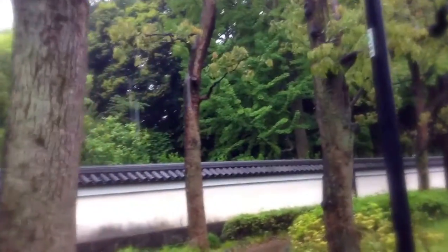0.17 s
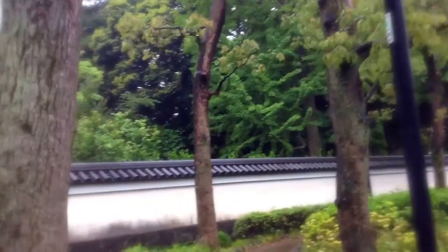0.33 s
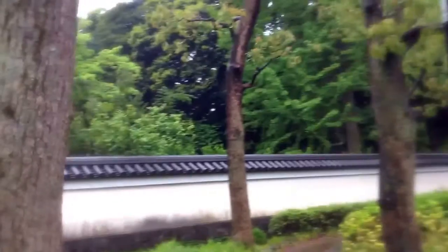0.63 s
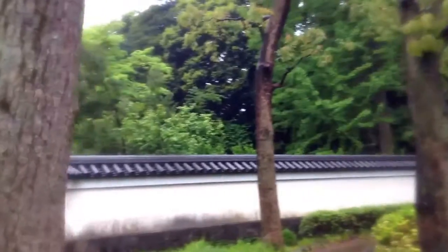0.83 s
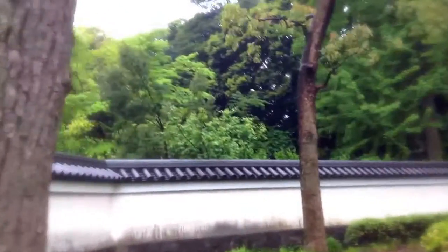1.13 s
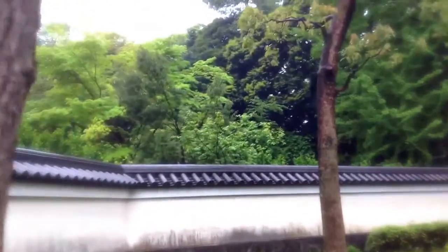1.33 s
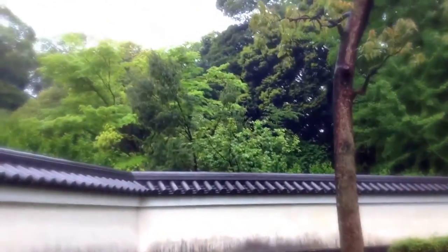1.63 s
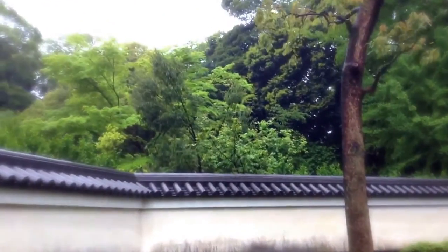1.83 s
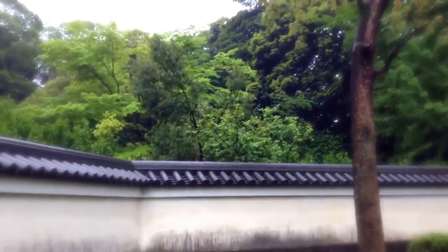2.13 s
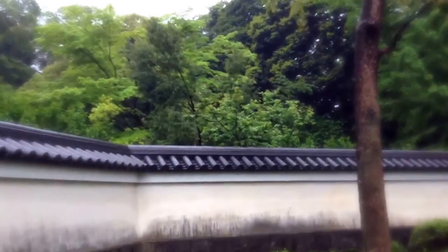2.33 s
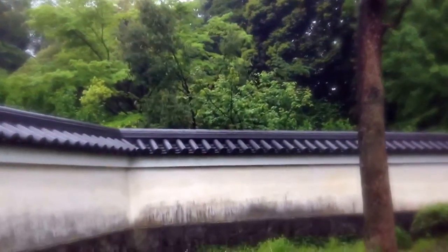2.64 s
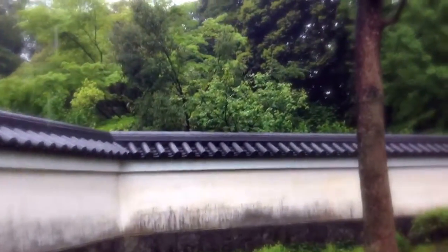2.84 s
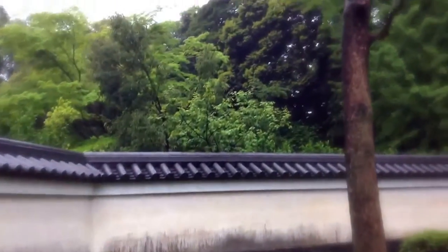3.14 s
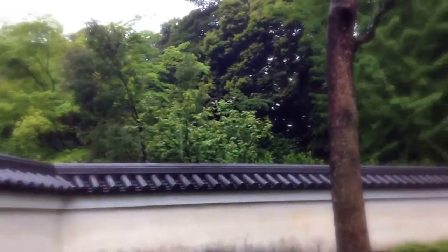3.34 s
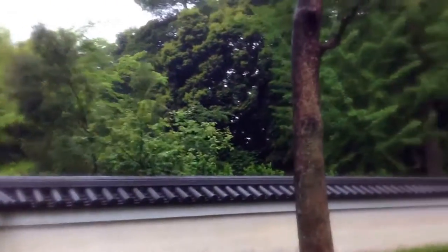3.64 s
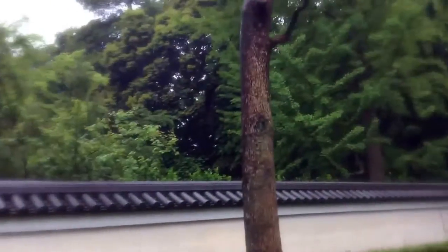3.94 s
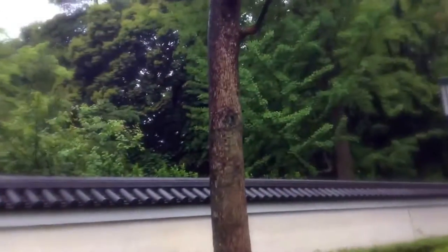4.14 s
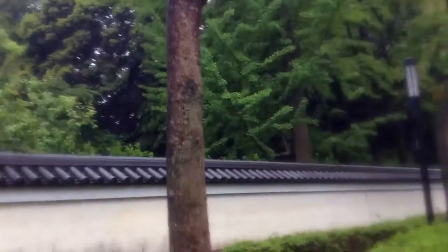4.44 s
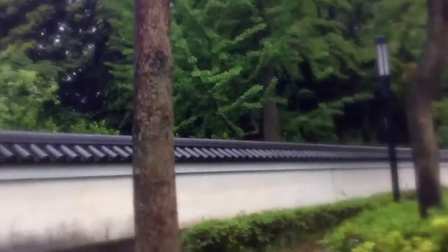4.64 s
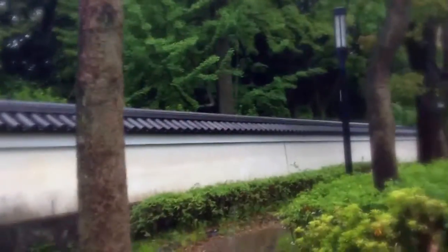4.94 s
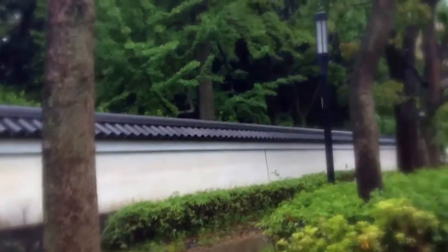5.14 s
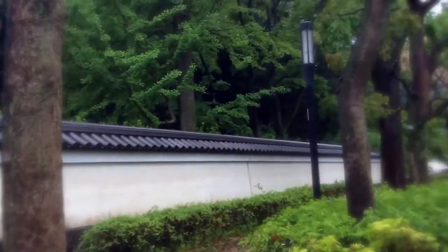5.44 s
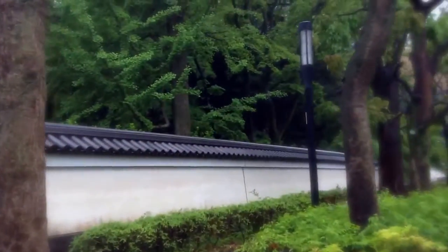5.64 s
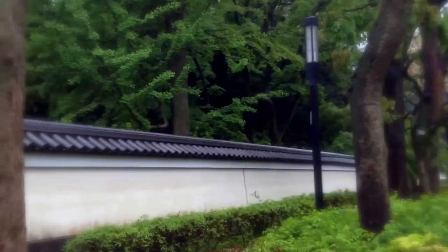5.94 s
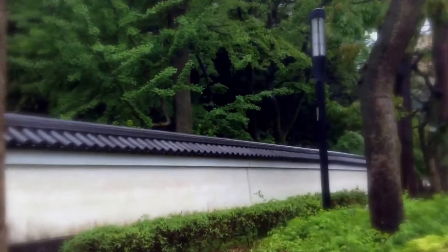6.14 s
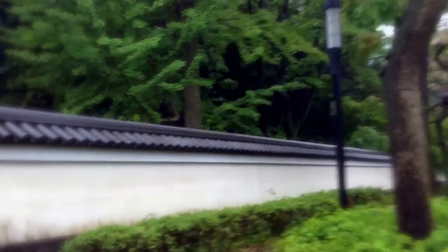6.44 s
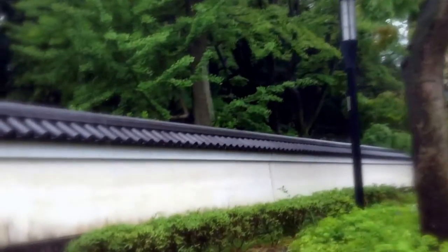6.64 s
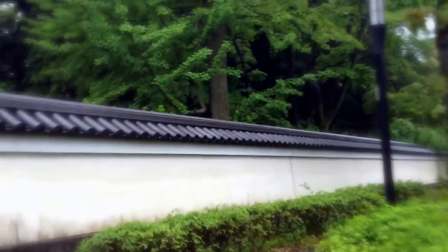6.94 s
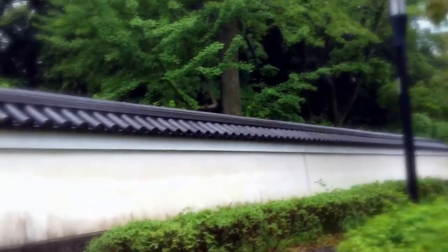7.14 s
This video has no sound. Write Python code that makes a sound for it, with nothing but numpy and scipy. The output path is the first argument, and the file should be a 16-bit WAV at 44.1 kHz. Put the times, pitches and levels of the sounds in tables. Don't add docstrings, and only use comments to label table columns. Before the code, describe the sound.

Rain is already falling at 0 s: a dull, muffled wash of far rain with dense fine patter on leaves, over low distant traffic rumble. It swells gradually. Soft, low drips boom on the umbrella canopy around 0.4-0.55 s, with weaker ones near 2 s and 2.5 s, and faint splashes tick between. From 3.4 s heavier drips knock close by, hollow and very short, with a small cloth snap. Hard hits at 3.6 and 3.9 s make the rain level drop instantly, then creep back; a lighter dip follows at 4.64 s. By then the leaves' treble fizz has faded. Knocks crowd together from 4.9 to 5.9 s, especially 5.3-5.87 s, holding the rain down. After a last strong knock at 6.0 s, drips become sparse, the rain recovers fuller, and a far engine drones low and wavering until the end, about 7.3 s.

```python
import sys
import numpy as np
from scipy import signal
from scipy.fft import rfft, irfft
from scipy.io import wavfile
from scipy.ndimage import uniform_filter1d

SR = 44100
rng = np.random.default_rng(int(sys.argv[2]) if len(sys.argv) > 2 else 0)


def to_wav(s):
    ch = np.atleast_2d(s).T
    pcm = np.round(np.clip(ch, -1, 1) * 32767)
    wavfile.write(sys.argv[1], SR, pcm.astype(np.int16))


def ratio_of_db(decibels):
    return 10 ** (np.asarray(decibels, float) / 20)


N = 321048


def evened(x):
    return x / np.sqrt(np.mean(x ** 2) + 1e-20)


def add(mix, s, sound):
    part = mix[round(s * SR):][:len(sound)]
    part += sound[:len(part)]


def band(x, lo_hz, hi_hz):
    return signal.sosfilt(signal.butter(2, [lo_hz, hi_hz], "bandpass", fs=SR, output="sos"), x)


def drift(first, second):
    return evened(uniform_filter1d(uniform_filter1d(rng.standard_normal(N), first), second))


def bumps_db(rows, t):
    return sum(db * np.exp(-((t - s) / length) ** 2) for s, length, db in rows)


# (middle t/s, length t/s, pitch f/Hz, level over the rain/dB)
ENGINE_ORDERS = [(6.2, .3, 159, -1), (6.95, .45, 158, -4), (6.25, .18, 198, -3), (7.12, .25, 200, -3),
                 (6.05, .06, 152, -4), (7.23, .05, 262, -4), (6.78, .07, 248, -3), (6.18, .06, 248, -5),
                 (2.88, .22, 166, -3), (3.48, .16, 122, -8), (1.45, .12, 247, -7), (4.75, .25, 120, -13),
                 (2.35, .15, 127, -11), (3.75, .1, 118, -11), (3.05, .06, 212, -4), (.9, .12, 95, -16)]
WAVER_HZ = 1.3


def engine(t):
    waver = WAVER_HZ * drift(5000, 3000)
    tones = 0
    for s, length, hz, db in ENGINE_ORDERS:
        turns = np.cumsum(hz + waver * hz / 160) / SR
        tones = tones + ratio_of_db(db) * np.exp(-((t - s) / length) ** 2) * np.sin(2 * np.pi * turns)
    return tones


# (middle t/s, length t/s, lift level/dB)
TRAFFIC_PASSES = [(2.899, 0.58, 1.5), (4.6, 0.05, 3.5), (6.7, 0.089, 3.5), (7.0, 0.38, -1), (6.4, 0.11, 4),
                  (0.5, .12, 4), (1.4, 0.2, 0), (2.4, 0.14, -1.5), (4.7, 0.11, -3), (3.23, .1, -2),
                  (0.78, .08, -1), (1.07, .06, 1.5), (6.62, .15, -3.5), (6.4, .12, -3), (2.63, .03, -3),
                  (3.02, .02, -3), (5.6, .06, 2.5)]
RUMBLE_DB = -1.5
DRONE_HZ, DRONE_WIDTH_HZ, DRONE_DB = 165, 12, -17


def rumble_layer(low_rain, t):
    hum = band(rng.standard_normal(N), DRONE_HZ - DRONE_WIDTH_HZ, DRONE_HZ + DRONE_WIDTH_HZ)
    rumble = evened(low_rain) + ratio_of_db(DRONE_DB) * evened(hum)
    return evened(rumble) * ratio_of_db(RUMBLE_DB + bumps_db(TRAFFIC_PASSES, t) + 0.74)


# (middle t/s, length t/s, lift level/dB)
LEAF_GUSTS = [(0.05, 0.22, 2), (1.166, 0.1, 3), (1.65, 0.12, 1), (2.3, 0.25, 2), (3.3, 0.26, 1),
              (2.7, 0.047, 2.5), (4.9, 0.066, 2), (5.2, 0.27, 1), (6.82, .05, -2), (7.15, .1, -0.5),
              (5.4, .03, 0.5), (0.83, 0.14, 0), (0.76, .05, 0.5), (1.29, .06, 2.5), (2.3, .06, 2.5),
              (1.92, 0.046, -0.5), (2.7, .04, -0.5), (2.7, .04, -2), (2.6, .04, 1.5), (2.27, .06, -2),
              (6.6, .06, -2)]
FIZZ_DB = -11
TURN_S, SHADE_DB = 4.65, -5.5


def fizz_layer(high_rain, t):
    fizz_db = FIZZ_DB + SHADE_DB * np.minimum(t / TURN_S, 1) + bumps_db(LEAF_GUSTS, t)
    return evened(high_rain) * ratio_of_db(fizz_db + 3.0)


def wash():
    frames = N // 64 + 8
    a, b, patches, flicker = rng.standard_normal((frames, 129, 4)).T
    patches = evened(uniform_filter1d(uniform_filter1d(patches, 4, 0), 50, 1))
    flicker = evened(uniform_filter1d(uniform_filter1d(flicker, 60, 0), 12, 1))
    z = (a + 1j * b) * ratio_of_db(1.0 * patches + 0.67 * flicker)
    return evened(signal.istft(z, nperseg=256, noverlap=192)[1][:N])


PATTER_PER_S, PATTER_SPREAD_DB, PATTER_DB = 1500, 3, -6


def patter():
    landed = rng.random(N) < PATTER_PER_S / SR
    size = ratio_of_db(PATTER_SPREAD_DB * np.minimum(rng.exponential(1, N), 2.8)) * landed
    leaf, out = rng.integers(0, 24, N), np.zeros(N)
    for k, hz in enumerate(np.geomspace(300, 12000, num=24)):
        turns = np.arange(0, 5, hz / SR)
        wavelet = turns * np.exp(-turns / 0.45) * np.sin(2 * np.pi * turns)
        out += signal.oaconvolve(size * (leaf == k), wavelet * hz / 12000)[:N]
    return evened(out)


# (f/Hz, level per Hz/dB)
MUFFLED_COLOUR = [(25.0, -38), (50.0, -24), (100.0, -9.5), (155.0, 2.35), (230.0, 3.5), (330.0, -3),
                  (650.0, -1), (1000.0, -3.5), (1600.0, -12.5), (2600.0, -25.5), (4500.0, -40.5),
                  (7500.0, -55.5), (11000.0, -67), (14300.0, -79)]


def muffle(x):
    hz, db = np.transpose(MUFFLED_COLOUR)
    half = np.interp(np.log(np.fft.rfftfreq(8192, 1 / SR) + 1), np.log(hz + 1), db)
    log_gain = np.log(ratio_of_db(np.maximum(half, -110)))
    circle = np.r_[log_gain, log_gain[-2:0:-1]]
    taps = np.fft.ifft(np.exp(np.conj(signal.hilbert(circle)))).real[:4096]
    return signal.oaconvolve(np.r_[x[-4096:], x], taps)[4096:4096 + len(x)]


# (t/s, drop level/dB)
GAIN_TRIPS = [
    (3.61, 15),
    (3.938, 15),
    (4.639, 9),
    (5.298, 14),
    (5.445, 12),
    (5.512, 7.5),
    (5.58, 11.5),
    (5.785, 10.5),
    (5.862, 10),
]
DUCK_FALL_S, DUCK_RELEASE_S = 0.0045, 0.4


def ducking_db(t):
    s, drop_db = np.transpose(GAIN_TRIPS)[:, :, None]
    since = np.maximum(t - s, 0)
    dips = drop_db * np.minimum(since / DUCK_FALL_S, 1) * np.exp(-since / DUCK_RELEASE_S)
    return -np.max(dips, axis=0)


# (t/s, rain level/dB)
SHOWER_LEVEL = [(0.0, -35.5), (0.4, -35.5), (0.7, -34.5), (0.95, -33.5), (1.5, -32.5), (2.05, -33),
                (2.45, -33), (3.3, -31.5), (3.7, -32.5), (3.85, -31), (4.15, -29.5), (4.5, -31), (5.0, -31),
                (5.7, -29.5), (6.3, -28), (6.75, -28.5), (7.27, -31)]
# (middle t/s, length t/s, lift level/dB)
CLUMPS_AND_LULLS = [(.4, 0.04, -0.5), (.85, 0.048, 1.5), (1.3, 0.062, -2.5), (1.45, 0.055, -1),
                    (2.6, 0.11, -1.5), (3.9, .04, 1.5), (6.4, .08, -2), (4.73, .008, -3), (7.159, .006, -2),
                    (2.525, .006, -3.5), (3.601, .004, -2), (3.3, 0.016, 1.5), (3.82, 0.022, 1),
                    (4.52, 0.035, 3), (5.05, 0.059, 2), (5.15, 0.052, -2.5), (5.55, 0.054, -1.5),
                    (6.62, .05, 1.5), (6.82, 0.041, 2), (7.27, .05, 0)]
FLUTTER_DB, FLUTTER_S = 0.17, 0.028


def shower_db(t):
    clump = round(FLUTTER_S * SR)
    swell_db = np.interp(t, *np.transpose(SHOWER_LEVEL))
    flutter_db = FLUTTER_DB * drift(clump, clump // 2)
    return swell_db + ducking_db(t) + bumps_db(CLUMPS_AND_LULLS, t) + flutter_db


def rain():
    t = np.arange(N) / SR
    full = muffle(wash() + ratio_of_db(PATTER_DB) * patter())
    hz, spectrum = np.fft.rfftfreq(N, 1 / SR), rfft(full)
    low = 1 / (1 + (hz / 330) ** 4)
    high = 1 / (1 + (1900 / (hz + 1)) ** 4)
    low_rain, high_rain = irfft(spectrum * low, N), irfft(spectrum * high, N)
    body = evened(full - low_rain - high_rain) * ratio_of_db(1.5)
    layers = body + rumble_layer(low_rain, t) + fizz_layer(high_rain, t) + engine(t)
    return layers * ratio_of_db(shower_db(t))


def splash(db, hz, rough):
    t = np.arange(len(rough)) / SR
    spray = band(band(rough, 0.62 * hz, min(1.08 * hz, 20000)), 0.6 * hz, min(1.5 * hz, 20000))
    return ratio_of_db(db - 2.5 - 60 * t / 0.0094) * np.minimum(t / 0.0006, 1) * evened(spray)


# (t/s, peak level/dB, pitch f/Hz)
LOOSE_SPLASHES = [(0.7547, -50, 7000), (1.5584, -48, 7000), (1.7644, -53, 7000), (2.789, -55, 9500),
                  (2.86, -61, 10000), (3.3223, -48, 7000), (3.3553, -53, 7000), (3.912, -58, 8500),
                  (4.1031, -58, 7000), (4.1764, -49, 7200), (4.258, -37, 3200), (4.636, -49, 7000),
                  (5.075, -51, 6800), (5.2639, -58, 7000), (5.4984, -50, 7000), (5.692, -38, 3220),
                  (5.747, -48, 4200), (6.6528, -57, 7000), (7.023, -58, 8500), (7.098, -54, 6000),
                  (1.519, -62, 8500), (1.903, -63, 8500), (2.052, -60, 8800), (3.913, -71, 12500),
                  (3.932, -72, 12000), (4.068, -72, 11000), (4.176, -75, 12500), (4.592, -64, 9400),
                  (4.637, -76, 12000), (5.074, -59, 9500), (6.97, -64, 8500), (1.102, -35, 2900),
                  (1.236, -42, 2950), (1.53, -41, 3080), (1.702, -37, 2600), (.751, -41, 2600),
                  (.999, -42, 2930), (.629, -43, 3040), (5.859, -40.5, 3750), (6.017, -26, 2100),
                  (3.933, -37, 2800), (5.51, -33, 3000), (5.756, -37, 3700), (1.103, -46, 4300),
                  (1.5544, -29, 1700), (2.1186, -30, 1700), (.3017, -33, 1700), (1.1233, -33, 1800),
                  (3.0604, -32, 1700), (3.607, -36, 2800), (5.455, -44, 3200), (2.5, -38, 2700),
                  (5.442, -45, 5200), (5.757, -47, 5800)]


def loose_splashes():
    out = np.zeros(N)
    for s, db, hz in LOOSE_SPLASHES:
        add(out, s, splash(db, hz, rng.standard_normal(900)))
    return out


def rib(db, hz):
    t = np.arange(2200) / SR
    decay = ratio_of_db(db - 60 * t * hz / 9.2)
    ring = decay * np.minimum(t / 0.00078, 1) * np.sin(2 * np.pi * hz * t)
    return band(ring, 0.35 * hz, 1.9 * hz)


# (t/s, peak level/dB, pitch f/Hz)
RIB_RINGS = [(3.609, -26, 500), (3.9341, -20.5, 300), (3.935, -25.5, 160), (4.542, -28, 210),
             (4.926, -13, 425), (5.095, -35, 600), (5.3014, -26, 290), (5.4422, -17, 394), (5.5, -18, 330),
             (5.51, -24, 440), (5.521, -27, 300), (5.5626, -22, 450), (5.575, -30, 600),
             (5.758, -11.5, 358), (5.782, -23, 385), (5.867, -23, 420), (6.018, -18.5, 380),
             (0.44, -27, 220), (.5545, -26, 200), (2.499, -30, 300), (.394, -25, 390), (0.4, -21, 410),
             (3.611, -24, 240), (3.609, -37, 95), (.3985, -18, 460), (.386, -24, 430), (2.668, -21, 190),
             (4.9255, -22, 600), (2.5345, -26, 380), (6.2, -21, 420), (5.5745, -27, 440), (.265, -19, 370),
             (.272, -24, 790), (6.575, -22, 260), (6.695, -21, 270), (2.512, -22, 270)]


def canopy_ribs():
    out = np.zeros(N)
    for s, db, hz in RIB_RINGS:
        add(out, s, rib(db, hz))
    return out


# (f/Hz, width f/Hz, level/dB)
CLOTH_MODES = [
    (1890, 600, 6.5),
    (2800, 420, 1),
    (3700, 380, -6),
    (5250, 600, -14),
    (6500, 900, -23),
]
CATCH_DB, TAUT_HZ = 4.0, 650


def canopy_knock(hz, t60, rough, t):
    swing = 0.78 / hz
    after = np.maximum(t - swing, 0)
    taut = min(hz / TAUT_HZ, 1)
    sag = 0.52 * taut * (1 - np.exp(-after / (0.6 * swing)))
    turns = np.cumsum(hz * (0.97 - sag)) / SR
    rise = np.minimum(t / (0.54 * swing), 1) ** 1.1
    catch_db = CATCH_DB * taut * np.clip(after / (0.49 * swing), 0, 1)
    knock = np.sin(2 * np.pi * turns) * rise * ratio_of_db(-60 * after / t60 - catch_db)
    rattle = evened(band(band(rough, 0.29 * hz, 1.07 * hz), 0.25 * hz, 1.9 * hz))
    rattle = rattle * ratio_of_db(-14.5 - 60 * t / 0.07) * np.minimum(t / 0.0018, 1)
    return band(knock + rattle, 0.14 * hz, 5.5 * hz)


def cloth_tick(rough):
    burst = signal.windows.hann(round(0.0009 * SR))
    splat = np.zeros(len(rough))
    splat[:len(burst)] = rough[::-1][:len(burst)] * burst + 3.0 * burst ** 40
    tick = 0
    for k, (hz, width, db) in enumerate(CLOTH_MODES):
        tick = tick + (-1) ** k * ratio_of_db(db) * band(splat, hz - width / 2, hz + width / 2)
    return tick / abs(tick).max()


# (t/s, peak level/dB, canopy pitch f/Hz, tick relative to the knock
# level/dB)
CANOPY_DRIPS = [(3.4035, -18, 562, -30), (3.6082, -12, 700, -21), (3.9341, -9, 770, -32),
                (4.166, -25, 390, -17), (4.3333, -19.5, 845, -17), (4.542, -9, 780, -32),
                (4.638, -17, 900, -18), (4.9254, -13, 665, -30), (5.076, -19, 820, -18),
                (5.0941, -15.5, 616, -22), (5.1196, -22, 714, -14), (5.2983, -11, 673, -22),
                (5.442, -10.5, 594, -25), (5.4993, -17, 834, -24), (5.5093, -10, 604, -29),
                (5.561, -16, 717, -17.5), (5.57480, -16, 652, -24), (5.734, -11, 617, -28),
                (5.7568, -10, 840, -39), (5.7822, -16, 840, -32), (5.8592, -10.5, 723, -34),
                (6.018, -14, 906, -21.5),
                (0.047, -24, 200, -40), (0.379, -22, 199, -40), (0.393, -21, 440, -37),
                 (0.405, -19, 440, -28), (0.5447, -17, 190, -35), (0.5557, -11, 205, -40),
                 (2.5005, -13.5, 210, -34), (2.5338, -15.5, 600, -37), (3.058, -19, 200, -40),
                 (4.9245, -20, 617, -17), (5.742, -20, 590, -26), (5.868, -24, 523, -26),
                 (0.877, -28, 840, -30), (1.05, -26, 545, -32), (1.881, -24, 890, -30),
                 (1.987, -18, 575, -30), (2.45, -22, 525, -28), (2.897, -21, 845, -30),
                 (3.323, -15, 530, -30), (3.814, -26, 660, -27), (4.4, -25, 593, -31),
                 (4.496, -24, 600, -31.5), (4.601, -29, 900, -27), (6.238, -17, 510, -24),
                 (7.095, -23, 410, -30), (7.161, -19, 690, -28)]
RING_CYCLES, HARD_DB, RING_PER_DB = 6.0, -10, -0.03
SPRAY_DB, SPRAY_HZ, SPRAY_LEAD_S = -19.5, 7000, 0.0011


def canopy_drips():
    out, t = np.zeros(N), np.arange(2200) / SR
    for s, db, hz, tick_db in CANOPY_DRIPS:
        rough = rng.standard_normal(2200)
        t60 = RING_CYCLES / hz * ratio_of_db(RING_PER_DB * (HARD_DB - db))
        drip = canopy_knock(hz, t60, rough, t) + ratio_of_db(tick_db + 6.0) * cloth_tick(rough)
        add(out, s - 0.78 / hz, ratio_of_db(db) * drip)
        add(out, s - SPRAY_LEAD_S, splash(db + tick_db + SPRAY_DB, SPRAY_HZ, rough[:900]))
    return out


def scene():
    close = loose_splashes() + canopy_ribs() + canopy_drips()
    return (rain() + band(close, 75, 19000))[None]


def roll_off(x):
    return signal.sosfilt(signal.butter(12, 14250, fs=SR, output="sos"), x)


def record(dry):
    ease = np.sin(np.pi / 2 * np.minimum(np.arange(N) / 44, 1)) ** 2
    return roll_off(dry * ease)


dry = scene()
out = record(dry)
to_wav(out)
```